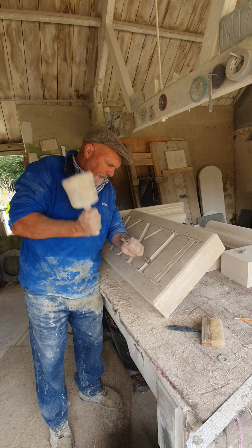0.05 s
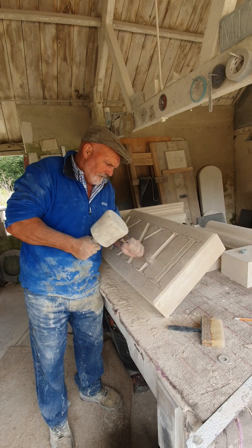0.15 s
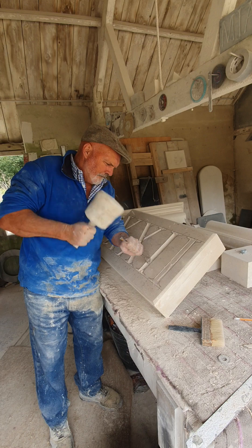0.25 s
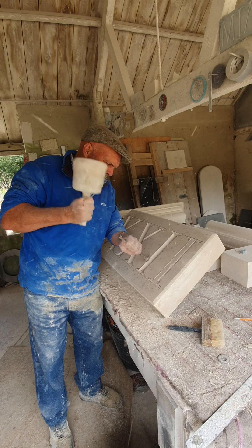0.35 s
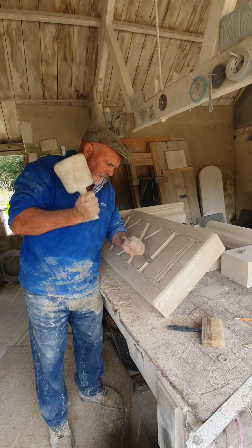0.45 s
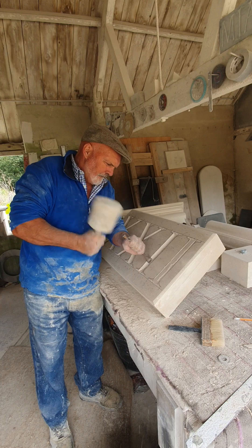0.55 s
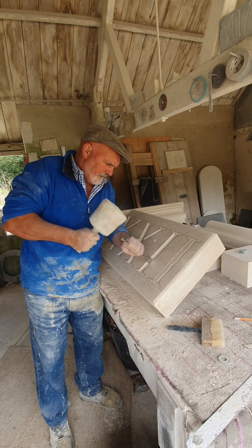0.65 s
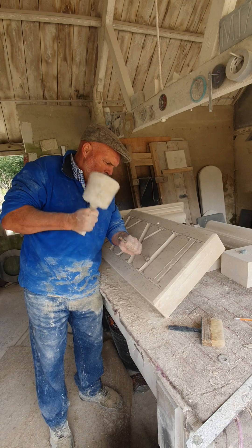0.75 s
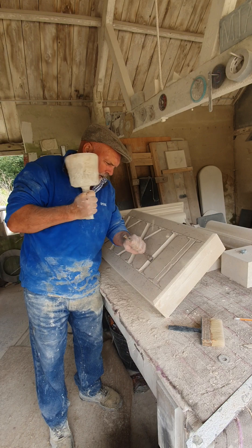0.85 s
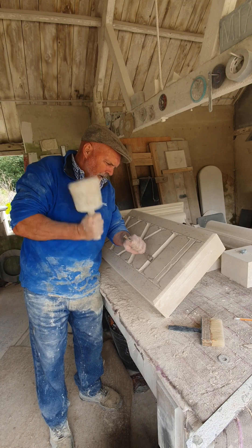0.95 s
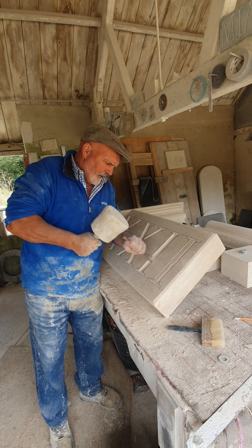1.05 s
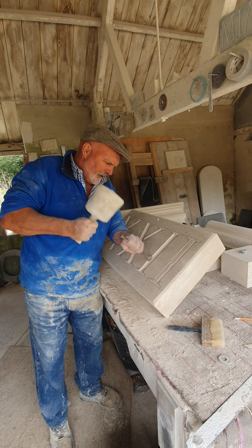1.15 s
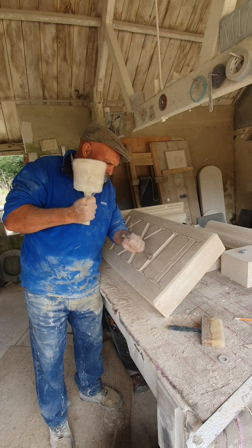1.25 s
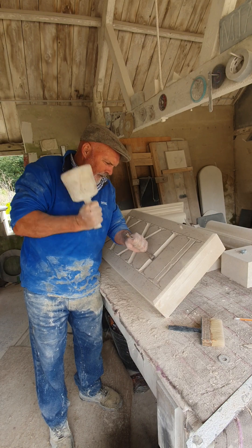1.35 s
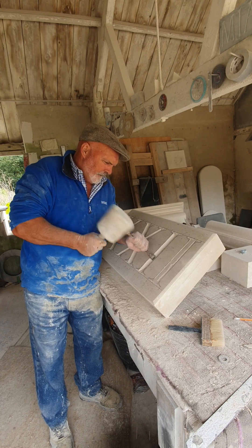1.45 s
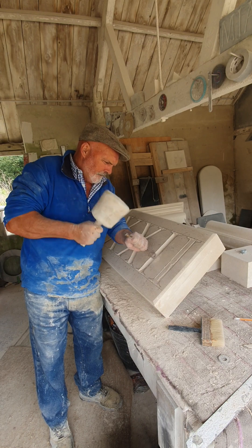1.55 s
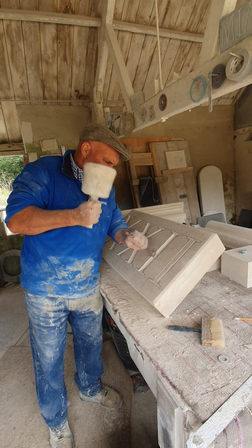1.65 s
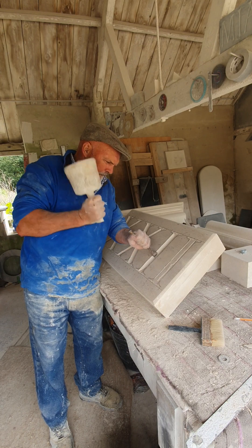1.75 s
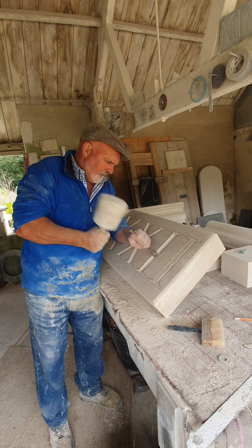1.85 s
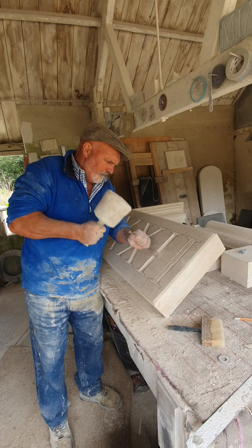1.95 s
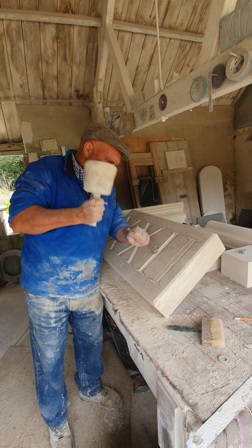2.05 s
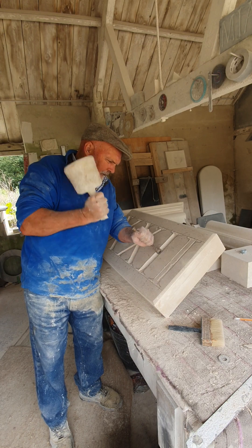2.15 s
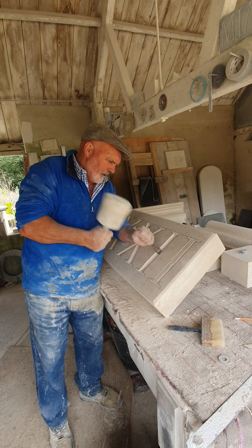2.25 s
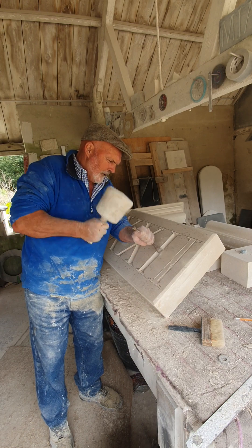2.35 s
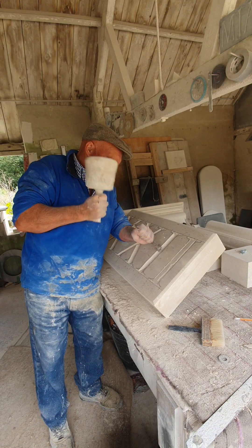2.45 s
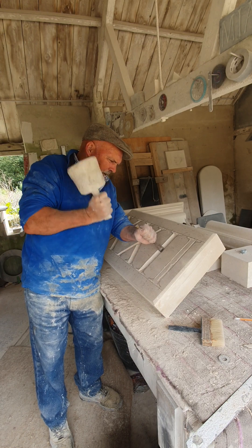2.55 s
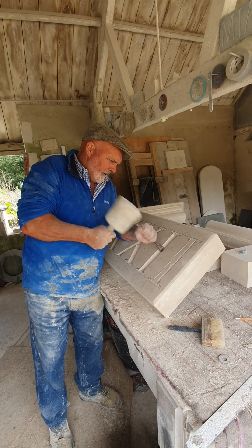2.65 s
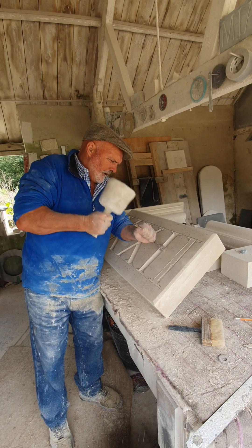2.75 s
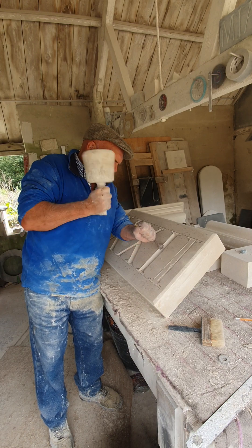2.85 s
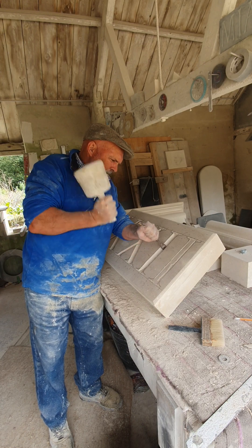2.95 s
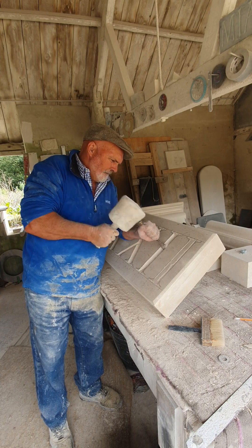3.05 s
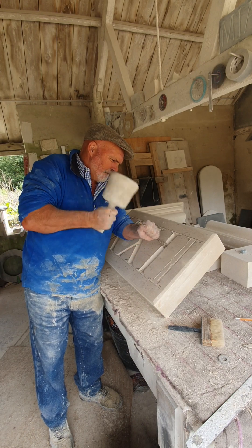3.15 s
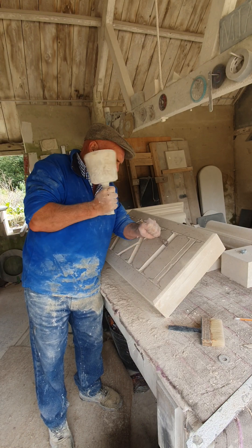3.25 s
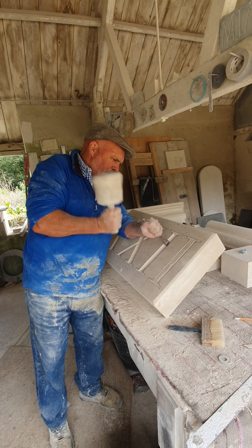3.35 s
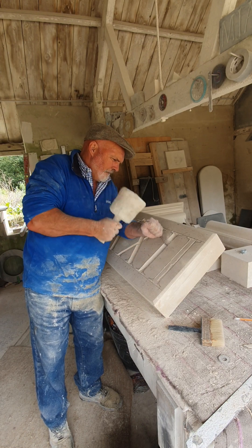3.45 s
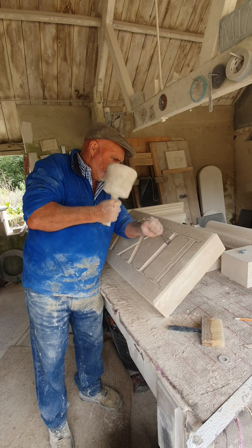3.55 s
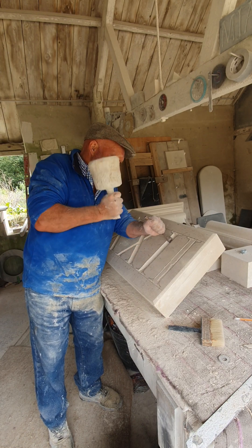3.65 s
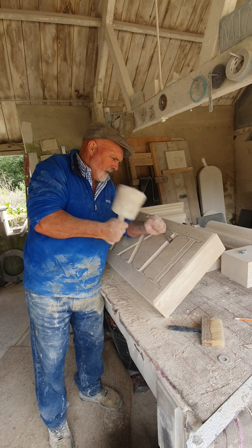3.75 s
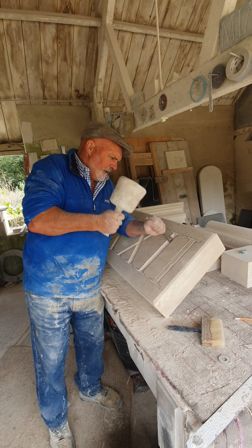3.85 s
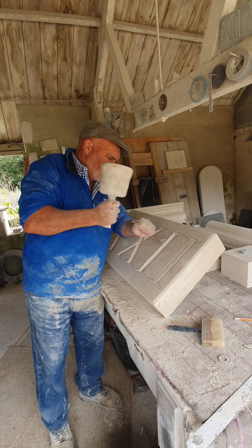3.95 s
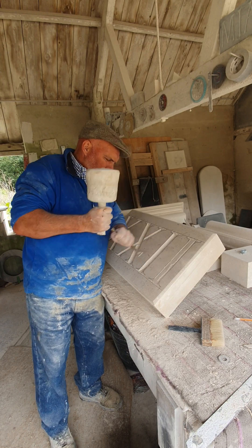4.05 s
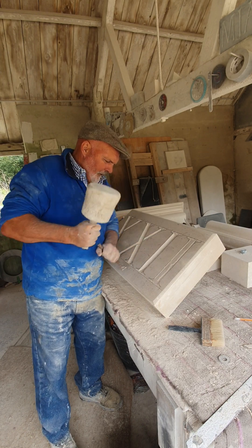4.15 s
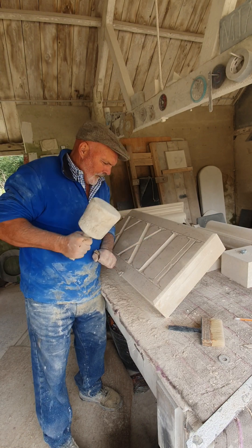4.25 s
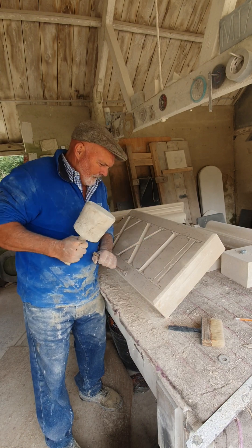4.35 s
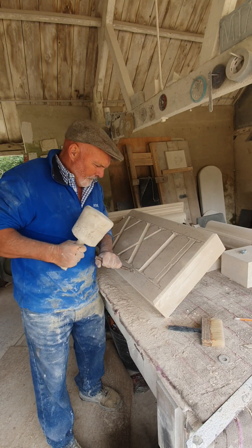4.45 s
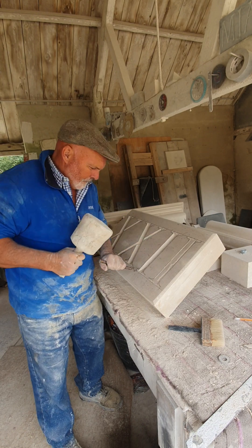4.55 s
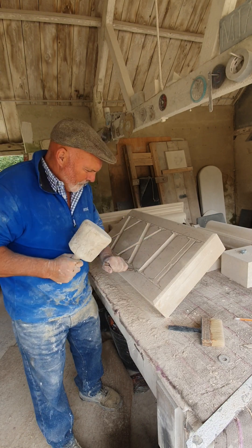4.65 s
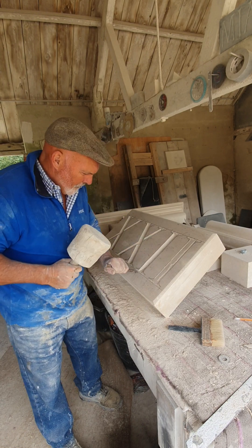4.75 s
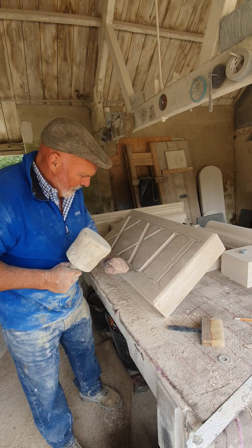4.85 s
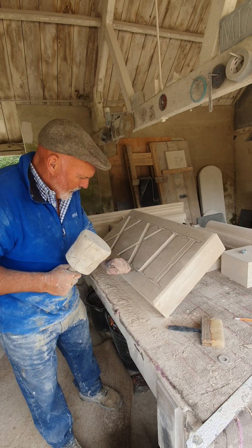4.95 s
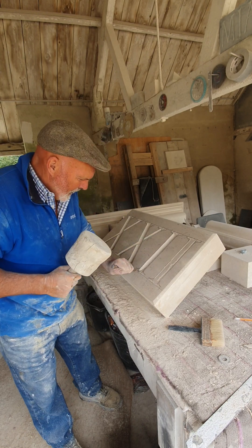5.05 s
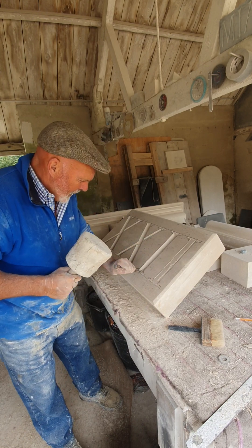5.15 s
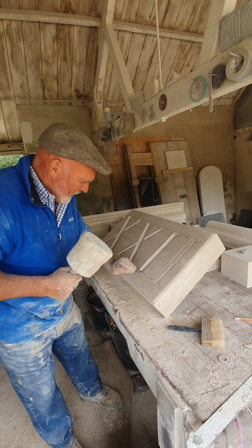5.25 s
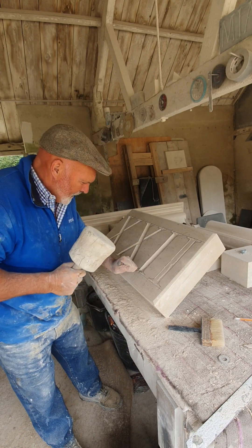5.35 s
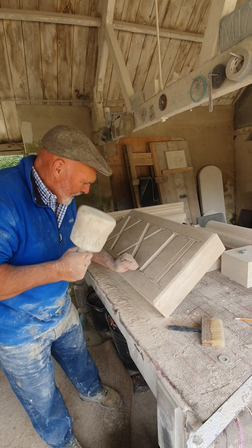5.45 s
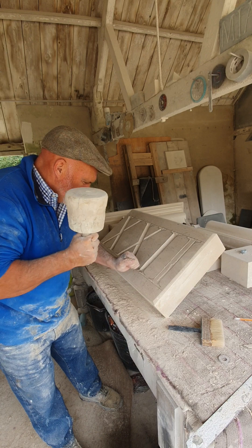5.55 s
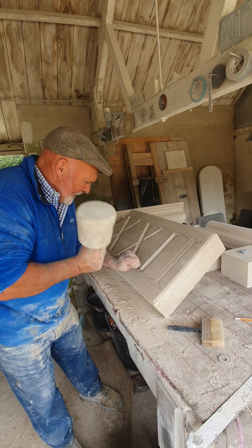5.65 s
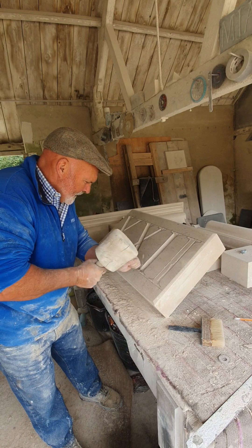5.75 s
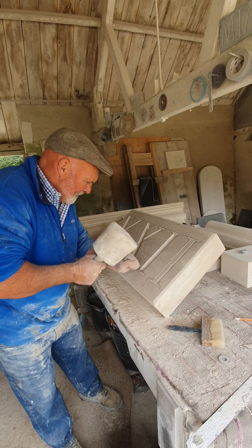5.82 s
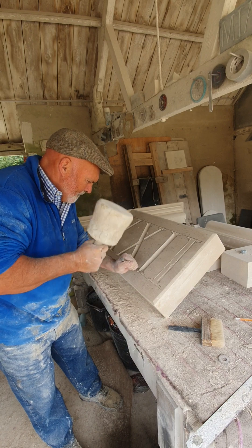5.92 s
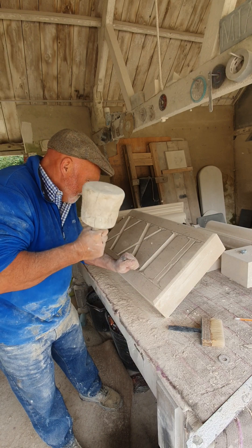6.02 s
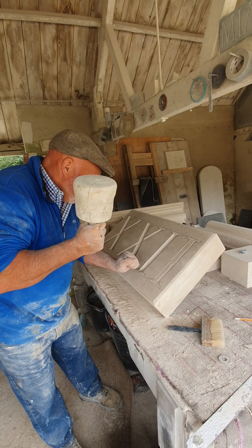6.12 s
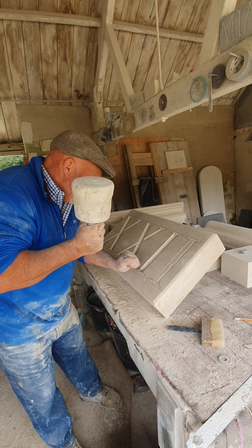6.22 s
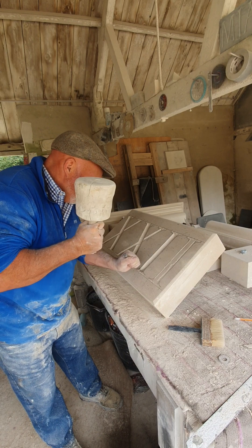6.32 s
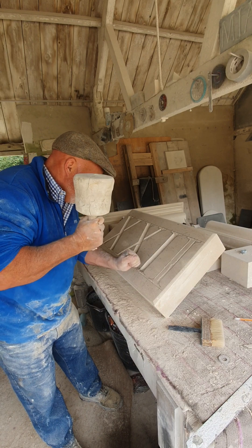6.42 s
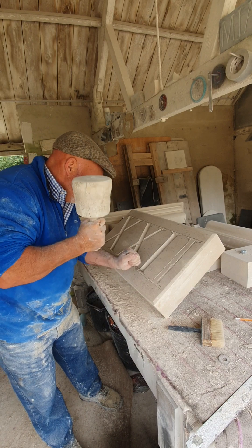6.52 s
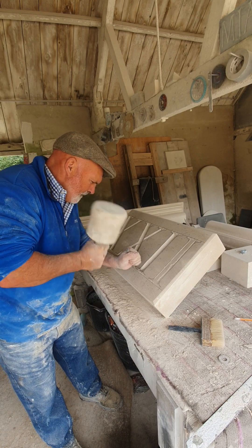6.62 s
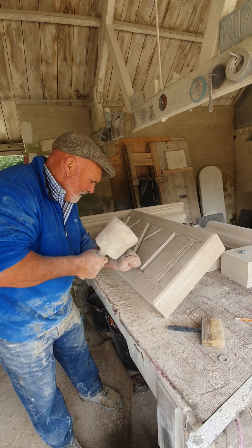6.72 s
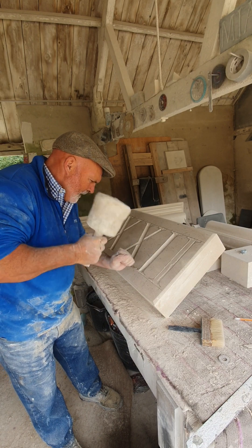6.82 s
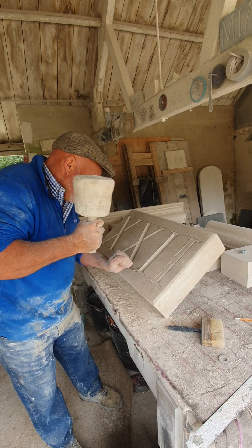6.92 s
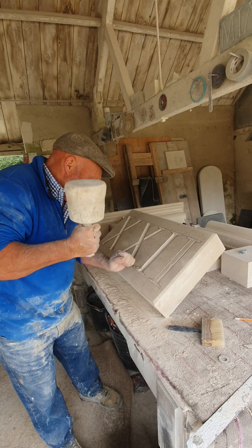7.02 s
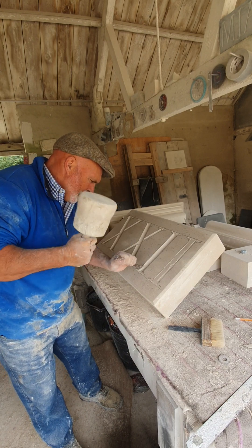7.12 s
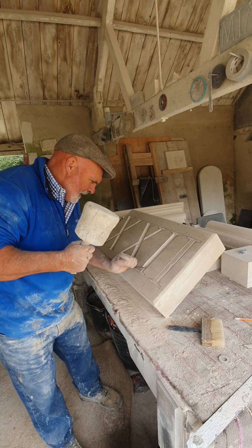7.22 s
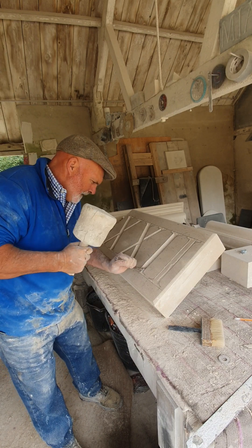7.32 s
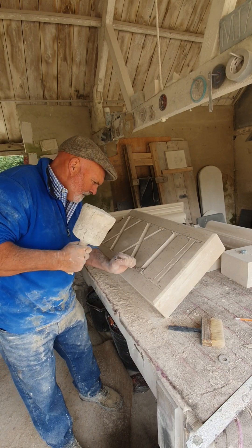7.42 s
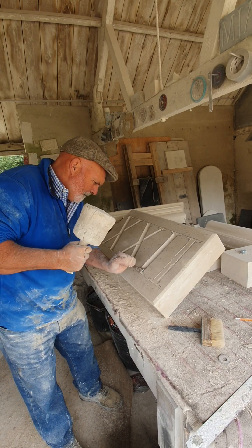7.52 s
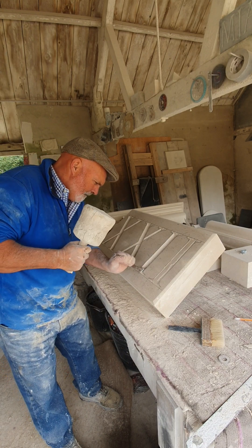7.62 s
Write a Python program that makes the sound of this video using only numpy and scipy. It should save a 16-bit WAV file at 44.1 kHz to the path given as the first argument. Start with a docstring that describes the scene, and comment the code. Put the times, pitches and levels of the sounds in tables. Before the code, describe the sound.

A round mallet raps a steel chisel into stone, ten steady hollow cracks with gritty scratches between, then a pause and two separate blows.

```python
"""Mason at the stone block

A mason drives a steel chisel into stone with a round mallet, in a timber-roofed workshop: ten even blows,
a pause, two single ones. Noise bursts make the crack, decaying sines the ring of shank and block and the
boom of the bench, and filtered noise tails the room. Between blows the edge scratches over grit and chips
tick down (shaped noise); feet thud softly (short sines) and swallows chirp faintly further off (sine
sweeps), over a restless low rumble and a faint hiss (coloured noise)."""
import sys
import numpy as np
from scipy import signal
from scipy.io import wavfile

SR = 44100
rng = np.random.default_rng(int(sys.argv[2]) if len(sys.argv) > 2 else 0)


def to_wav(sig):
    """Store sig (one row per channel, or 1-D mono) as 16-bit WAV at the path in sys.argv[1].

    Samples outside -1..1 are clipped; the rate is SR.
    """
    pcm = np.clip(np.atleast_2d(sig), -1, 1) * 32767
    pcm = np.round(pcm).astype(np.int16)
    wavfile.write(sys.argv[1], SR, pcm.T)  # frames by channels


N = 338688
TIME = np.arange(N) / SR
AGE = TIME[:int(.75 * SR)]  # s since the onset of one event
BAND_EDGES_HZ = 22.4 * 2 ** (np.arange(30) / 3)  # third-octaves

# All table levels are relative; each layer may add its own trim.
# mallet blows: [t/s, bench boom level/dB, block knock level/dB, crack level/dB, crack brightness/dB per octave,
#                chisel ring level/dB, zing f/Hz, zing level/dB]
BLOWS = [(0.22, -1.5, 0.5, -4.5, 3.5, -36.5, 6020, -22.5), (0.669, 3, 0.5, -0.5, 3, -42, 3220, -12.5),
         (1.114, 1, -2, -4.5, 3, -33.5, 5720, -20), (1.55, -5.5, -2, -4.5, 1, -55, 2980, -25),
         (1.968, -1, -2, 0, 0.6, -45, 5370, -21), (2.365, -1, -3.5, -3.5, -1, -47, 5650, -30),
         (2.7507, -0.5, 2.5, -5.5, -0.5, -64, 5700, -24.5), (3.132, -0.5, 3, -2, 0.8, -55, 5500, -22.5),
         (3.4987, -3.5, 1, -5.5, 3.5, -37.5, 5850, -18), (3.862, 3.5, 4.5, -1.5, -3, -30, 2890, -19),
         (5.8157, -3, 1.5, -4, 3, -26, 6510, -21.5), (6.7599, -2.5, -4, -10.5, -2, -64.5, 2920, -38)]
# modes of the bench under the block: [f/Hz, level/dB, t60/s]
BENCH_MODES = [(60.6, -32.5, 0.68), (80.6, -14.5, 0.43), (86.4, -21.5, 0.45), (117.56, -23, 0.55),
               (126.5, -10, 0.16), (154.3, -27.5, 0.52), (164.6, -38, 0.4), (197.5, -22.5, 0.21),
               (221.4, -25.5, 0.4), (237, -24.5, 0.5), (266.7, -21.5, 0.1), (287, -30, 0.12),
               (310.4, -23, 0.25), (333.6, -27.5, 0.24), (320.7, -18.5, 0.21), (413.4, -24, 0.11),
               (370, -37.5, 0.17), (456.5, -14, 0.11), (487.1, -18, 0.27), (539, -23, 0.12),
               (555, -23.5, 0.26), (594, -21, 0.1), (637, -31, 0.2)]
# modes of the stone block: [f/Hz, level/dB, t60/s]
BLOCK_MODES = [(896, -35.5, .27), (1023, -35.5, 0.13), (1047, -38.5, 0.29), (1126, -34.5, 0.25),
               (1190, -32.5, 0.43), (1236, -33.5, .28), (1493, -44, 0.38), (1943, -39.5, .28),
               (2110, -44.5, 0.33), (2330, -43.5, 0.14), (2632, -40.5, 0.36), (2790, -38.5, .25),
               (2986, -40.5, 0.32), (3750, -45, .11)]
# how a light touch wakes the modes: [f/Hz, level/dB]
TOUCH_SPECTRUM = [(80, -14.5), (330, -12), (485, -1), (550, -0.5), (700, -11), (1100, -10), (1190, 3.5),
                  (1250, -2), (1500, 4.5), (2100, 7.5), (2700, -6), (4000, -1.5)]
# the edge breaking stone: [f/Hz, level/dB]
CRACK_SPECTRUM = [(60, -5), (280, 11.5), (550, -4), (1100, -4.5), (1700, -12.5), (3000, -6), (4500, -17.5),
                  (6000, -14.5), (8000, -37), (10000, -34), (12500, -30), (16000, -47)]
# the workshop's answer to a blow: [f/Hz, level/dB, t60/s]
WORKSHOP_TAIL = [(45, -17.5, .6), (99.5, -3.5, .55), (300.9, -7, 0.46), (510, -6.5, 0.44),
                 (782.4, -21, 0.3), (990, -16.5, .34), (1500, -25, .35), (2738, -19.5, 0.35),
                 (4300, -30, 0.29), (6570, -41, 0.38), (9000, -46, 0.06), (11800, -44.5, 0.27),
                 (16100, -62, 0.23)]
# the chisel set down and chips landing: [t/s, level/dB, f/Hz, block and bench ring level/dB]
TICKS = [(0.026, -34, 1600, -29.5), (0.485, -31, 2800, -30), (0.572, -29, 6500, -46),
         (0.871, -37, 3200, -37), (0.916, -39.5, 1700, -30), (1.363, -35, 1600, -28.5),
         (1.401, -45.5, 3000, -42), (1.418, -50, 7960, -54), (1.891, -17.5, 2600, -45.5),
         (2.220, -29.5, 2700, -22.5), (2.59, -40.5, 1813, -25), (2.976, -44, 3800, -27),
         (3.369, -51.5, 2000, -34.5), (3.728, -48, 3500, -32.5), (3.836, -36, 5000, -39),
         (3.901, -39, 11000, -38.5), (4.781, -64, 550, -39.5), (7.328, -51, 1890, -41.5)]
# the edge dragging over grit: [f/Hz, level/dB]
GRIT_SPECTRUM = [(500, -49), (1200, -54.5), (1700, -56), (2800, -58), (6300, -64.5), (8500, -81.5),
                 (16000, -80)]
# soft thuds of shifting weight: [t/s, level/dB]
THUDS = [(2.19, -31), (2.642, -31), (2.693, -27.5), (3.79, -35), (4.064, -20.5), (4.178, -31),
         (4.337, -34.5), (4.684, -33), (4.972, -39.5), (6.078, -33), (6.306, -34.5), (6.48, -36),
         (6.635, -36), (6.712, -28), (7.277, -27)]
# swallow chirps: [t/s, level/dB, top f/Hz]
CHIRPS = [(4.089, -57.5, 6800), (4.212, -61, 6740), (4.65, -73, 7100), (4.735, -68, 6400),
          (4.809, -72.5, 4540), (4.854, -65, 6230), (5.72, -65.5, 6560), (5.782, -60.5, 5140),
          (5.919, -58, 5050), (6.19, -66, 6180), (6.315, -65, 6340), (6.564, -73, 5010),
          (6.709, -72.5, 5360)]
# still air in the workshop: [f/Hz, level/dB]
AIR_SPECTRUM = [(25, -40.5), (55, -30), (120, -35), (250, -41), (480, -54), (700, -69.5), (1100, -75.5),
                (2500, -77.5), (6000, -78.5), (9000, -89), (16000, -89.5)]
# how the low rumble rises and falls: [t/s, level/dB]
RUMBLE_LEVEL = [(0, 13), (.6, 0), (2, 1), (4.2, 14), (4.6, -3.5), (5.4, 4), (6.4, 2.5), (7.1, 2.5),
                (7.68, -5.5)]
# left-right likeness of diffuse sound: [f/Hz, correlation]
LIKENESS = [(35, -0.26), (100, 0.88), (300, 0.81), (550, 0.56), (1000, 0.12), (2000, -0.33), (16000, 0)]

# where the thump, boom, knock and crack of a blow lie
THUMP_HZ, BOOM_HZ, KNOCK_HZ, CRACK_HZ = 100, 420, 1050, 2800
THUMP_FOLLOWS = .3  # the mallet's weight keeps the thump even: its share of the boom's swing in dB
BLOCK_VARY_DB = 2.0  # how differently each contact shares itself out among the block's modes
CRACK_S, TICK_S = .0013, .0022  # decay time constants of the first stone burst and of a light contact
CHISEL_HZ, CHISEL_T60_S = 1853.5, .26  # the shank, damped by the hand
ROOF_ECHO_S, ROOF_ECHO_DB = .029, -18.5
# in a run the edge is slid on after each blow: when it drags hardest, how hard, how fast that builds and eases
RUN_GAP_S = .7  # blows closer than this belong to one run
DRAG_AFTER_S, DRAG_DB, DRAG_BUILD_DB_PER_S, DRAG_EASE_DB_PER_S = .225, 3.5, 50.5, 106.5
REST_DB = -48  # the edge at rest in the groove
THUD_HZ, THUD_FALL_HZ_PER_DB = 71, 1.4  # a heavier thud is deeper: pitch at -30 dB and its fall per dB
CHIRP_START_HZ, CHIRP_S = 3980, 0.0301  # start of every sweep, before waver, and its length
HISS_FROM_HZ = 520  # above this the air is a steady hiss
CUTOFF_HZ = 15900


def force(blow, hz):
    """Gain of a blow by frequency: the grip shares it among bench, block and edge; depth of cut tilts the crack."""
    _, boom_db, knock_db, crack_db, brightness, *_ = blow
    corners_hz = [THUMP_HZ, BOOM_HZ, KNOCK_HZ, CRACK_HZ]
    corners_db = [THUMP_FOLLOWS * boom_db, boom_db, knock_db, crack_db]
    body_db = np.interp(np.log(hz), np.log(corners_hz), corners_db)
    octaves_above = np.maximum(np.log2(hz / CRACK_HZ), 0)
    return from_db(body_db + brightness * octaves_above)


def cracks(level_db=0.5, crumble_db=-7.5, crumble_s=0.0075, rise_s=0.00098, alike=0.78):
    """The edge breaks the stone in a sharp burst, then crumbs give way for a few milliseconds."""
    out, age = np.zeros((2, N)), AGE[:SR // 10]
    decay = np.exp(-age / CRACK_S) + from_db(crumble_db) * np.exp(-age / crumble_s)
    burst = (1 - np.exp(-age / rise_s)) ** 2 * decay
    burst /= burst.max()
    # a square blow that rings the shank also cracks harder
    ring_db = np.array([ring for *_, ring, _, _ in BLOWS])
    hardness_db = 0.077 * (ring_db - ring_db.mean())
    for low, hz, high in bands():
        likeness = alike if hz > 1000 else at_hz(LIKENESS, hz / 2)
        noise = np.array([pair_noise(len(age), likeness) for blow in BLOWS])
        bursts = band(noise * burst, low, high)
        for blow, hard_db, sound in zip(BLOWS, hardness_db, bursts):
            gain = from_db(level_db + hard_db + at_hz(CRACK_SPECTRUM, hz)) * force(blow, hz)
            add(out, blow[0], gain * sound)
    # the crack reaches the left microphone two samples late
    return np.array([np.roll(out[0], 2), out[1]])


def chisel(ring_db=2.0, zing_db=-4.0, zing_t60=0.014):
    """The shank rings on one note; the edge zings for an instant as it skids into the stone."""
    out = np.zeros((2, N))
    for s, *_, ring, zing_hz, zing in BLOWS:
        shank = struck(CHISEL_HZ, CHISEL_T60_S, rise_s=0.0051, lag_s=.0001)
        skid = struck(zing_hz, zing_t60, rise_s=0.00017, lag_s=.00002) * 2
        add(out, s, from_db(ring + ring_db) * shank)
        add(out, s, from_db(zing + zing_db) * skid)
    return out


def bench_and_block(bench_db=0.0, block_db=0.0, bench_vary_db=1.8):
    """The bench booms and the block rings; every contact shares itself out differently among the modes."""
    out = np.zeros((2, N))
    bench = from_db(bench_db) * mode_shapes(BENCH_MODES, rise_s=0.0055, lag_s=-0.00016)
    block = from_db(block_db) * mode_shapes(BLOCK_MODES, rise_s=0.0018, lag_s=-.00026)
    shapes = np.concatenate([bench, block])
    hz = np.array([mode[0] for mode in [*BENCH_MODES, *BLOCK_MODES]])
    vary_db = np.repeat([bench_vary_db, BLOCK_VARY_DB], [len(BENCH_MODES), len(BLOCK_MODES)])
    blows = [(blow[0], force(blow, hz)) for blow in BLOWS]
    touches = [(s, from_db(db + at_hz(TOUCH_SPECTRUM, hz))) for s, *_, db in TICKS]
    for s, gains in blows + touches:
        shares = from_db(vary_db * rng.standard_normal(len(hz)))
        add(out, s, np.tensordot(gains * shares, shapes, 1))
    return out


def mode_shapes(modes, rise_s, lag_s, bloom_db=6.5, bloom_s=.011):
    """Each mode's answer to a unit blow, signs alternating; those near 500 Hz are stronger and bloom later."""
    shapes = []
    for k, (hz, db, t60) in enumerate(modes):
        blooms = 465 < hz < 565
        gain = (-1) ** k * from_db(db + blooms * bloom_db)
        shapes.append(gain * struck(hz, t60, rise_s + blooms * bloom_s, lag_s))
    return np.array(shapes)


def struck(hz, t60, rise_s, lag_s):
    """One mode swells and dies; its wave is shifted by lag_s on the left (later if positive)."""
    wave = np.sin(2 * np.pi * hz * (AGE - np.array([[lag_s], [0]])))
    return wave * fade(t60) * (1 - np.exp(-AGE / rise_s)) ** 2


def workshop(level_db=4.5, rise_s=.004, fresh=0.55):
    """Reflections from walls and roof: partly the same after every blow, each band with its own decay."""
    out = np.zeros((2, N))
    bass, treble = np.zeros((2, len(BLOWS), 2, len(AGE)))
    for low, hz, high in bands():
        same, *own = [pair_noise(len(AGE), at_hz(LIKENESS, hz)) for k in range(len(BLOWS) + 1)]
        noise = np.sqrt(1 - fresh) * same + np.sqrt(fresh) * np.array(own)
        envelope = fade(at_hz(WORKSHOP_TAIL, hz, axis=2)) * (1 - np.exp(-AGE / rise_s))
        tails = band(noise * envelope, low, high, order=3)
        forces = np.array([force(blow, hz) for blow in BLOWS])
        gains = from_db(level_db + at_hz(WORKSHOP_TAIL, hz)) * forces
        part = treble if hz > 1400 else bass
        part += gains[:, None, None] * tails
    for (s, *_), bass_tail, treble_tail in zip(BLOWS, bass, treble):
        add(out, s, bass_tail)
        # the stone gives way in a few steps, which combs each treble tail with peaks of its own
        steps = np.array([1, .25, -.25, .2, -.15])
        delays_s = np.cumsum([0, *rng.uniform(.0006, .0024, 4)])
        for step, delay_s in zip(steps / np.linalg.norm(steps), delays_s):
            add(out, s + delay_s, step * treble_tail)
    return out


def with_roof_echo(x):
    """A sound and its one clear reflection from the roof."""
    out = x.copy()
    add(out, ROOF_ECHO_S, from_db(ROOF_ECHO_DB) * x)
    return out


def ticks(width=1.1):
    """Light contacts of steel and chips on the block: tiny noise bursts, each filtered around its pitch."""
    out = np.zeros((2, N))
    for s, db, hz, _ in TICKS:
        burst = pair_noise(len(AGE), .6) * np.exp(-AGE / TICK_S)
        tick = band(burst, hz / width, hz * width, order=1)
        add(out, s, from_db(db) * tick / np.abs(tick).max())
    return reverberate(out, t60=0.38, wet_db=-5.5)


def grit(rough_db=3.0):
    """Uneven scratching while the edge slides on in the groove."""
    roughness_db = rough_db * (drift(27) + drift(120)) / 2
    return coloured(GRIT_SPECTRUM) * from_db(drag() + roughness_db)


def drag():
    """Drag level in dB: one swell after each blow of the run, which is already under way at the start."""
    times = np.array([s for s, *_ in BLOWS])
    before_start = 2 * times[0] - times[1]
    run = [before_start, times[0], *times[1:][np.diff(times) < RUN_GAP_S]]
    late = TIME - np.array(run)[:, None] - DRAG_AFTER_S
    swells_db = DRAG_DB + np.minimum(DRAG_BUILD_DB_PER_S * late, -DRAG_EASE_DB_PER_S * late)
    return np.maximum(swells_db.max(axis=0), REST_DB)


def thuds(swell_s=0.0052):
    """Feet shift on the floor: dull bumps of a cycle or two, the heavier the deeper."""
    out = np.zeros((2, N))
    envelope = (AGE / swell_s / 2) ** 2 * np.exp(2 - AGE / swell_s)
    for s, db in THUDS:
        hz = THUD_HZ - THUD_FALL_HZ_PER_DB * (db + 30)
        add(out, s, from_db(db) * np.sin(2 * np.pi * hz * AGE) * envelope)
    return out


def swallows(level_db=0.0, waver=0.085):
    """Quick, wavering upward sweeps, heard mostly through the room."""
    out, along = np.zeros((2, N)), np.clip(AGE / CHIRP_S, 0, 1)
    for s, db, top_hz in CHIRPS:
        sweep_hz = CHIRP_START_HZ + (top_hz - CHIRP_START_HZ) * along
        hz = sweep_hz * (1 + waver * drift(360)[:len(AGE)])
        chirp = np.sin(2 * np.pi * np.cumsum(hz) / SR) * np.sin(np.pi * along)
        add(out, s, from_db(db + level_db) * chirp)
    return reverberate(out, t60=0.45, wet_db=6.0)


def air(lumpy_db=4.0, hiss_db=3.5):
    """A low, restless rumble under a faint steady hiss, both split from one coloured noise."""
    noise = coloured(AIR_SPECTRUM)
    rumble, hiss = [signal.sosfilt(signal.butter(5, HISS_FROM_HZ, kind, fs=SR, output="sos"), noise)
                    for kind in ("low", "high")]
    rumble_db = np.interp(TIME, *np.transpose(RUMBLE_LEVEL)) + lumpy_db * drift(10)
    return rumble * from_db(rumble_db) + from_db(hiss_db) * hiss


def coloured(spectrum):
    """Steady diffuse noise, built from bands weighted by a spectrum."""
    return sum(from_db(at_hz(spectrum, hz)) * band(pair_noise(N, at_hz(LIKENESS, hz)), low, high, order=3)
               for low, hz, high in bands() if high > spectrum[0][0])


def reverberate(x, t60, wet_db):
    """The direct sound and a diffuse tail of its own at each microphone."""
    tail = rng.standard_normal((2, len(AGE))) * fade(t60)
    tail /= np.sqrt(np.sum(tail ** 2, axis=1, keepdims=True))
    return x + from_db(wet_db) * signal.fftconvolve(x, tail, axes=1)[:, :N]


def pair_noise(size, alike):
    """White noise for two microphones with a given correlation, from shared and opposed parts."""
    mid, side = rng.standard_normal((2, size))
    return np.sqrt((1 + alike) / 2) * mid + np.sqrt((1 - alike) / 2) * side * [[1], [-1]]


def drift(rate):
    """Smooth random wander about zero, with `rate` new values a second."""
    return np.interp(TIME * rate, np.arange(2000), rng.standard_normal(2000))


def fade(t60):
    """A decay that loses 60 dB in t60 seconds."""
    return np.exp(-np.log(1000) * AGE / t60)


def band(x, low, high, order=2):
    """Band-pass between two frequencies in Hz."""
    sos = signal.butter(order, [low, min(high, .45 * SR)], "band", fs=SR, output="sos")
    return signal.sosfilt(sos, x + 1e-18)  # the tiny offset keeps silence from slowing the filter


def bands():
    """The bank of bands: (low, centre, high) in Hz."""
    low, high = BAND_EDGES_HZ[:-1], BAND_EDGES_HZ[1:]
    return zip(low, np.sqrt(low * high), high)


def at_hz(points, hz, axis=1):
    """Read one column of a spectrum on a log-frequency axis."""
    table = np.array(points)
    return np.interp(np.log(hz), np.log(table[:, 0]), table[:, axis])


def from_db(db):
    """Decibels to gain."""
    return 10 ** (np.asarray(db) / 20)


def add(out, s, sound):
    """Mix a sound in at a given time in seconds."""
    start = max(round(s * SR), 0)
    out[:, start:start + sound.shape[-1]] += sound[..., :N - start]


def scene():
    """The work sits a little to the right of the microphones, over feet, birds and air."""
    work = bench_and_block() + with_roof_echo(chisel() + cracks()) + workshop() + ticks() + grit()
    lean_right = from_db(0.52 * np.array([[-1], [1]]))
    return work * lean_right + thuds() + swallows() + air()


def record(dry):
    """The highest peaks are rounded and the top is cut."""
    rounded = dry / (1 + (dry / .9) ** 4) ** (1 / 4)
    return signal.sosfilt(signal.ellip(10, .1, 80, CUTOFF_HZ, fs=SR, output="sos"), rounded)


dry = scene()
out = record(dry)
to_wav(out)
```